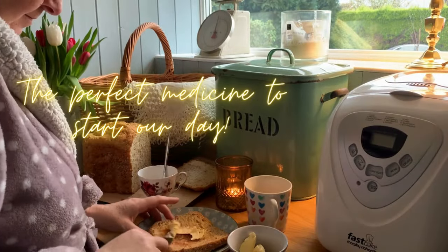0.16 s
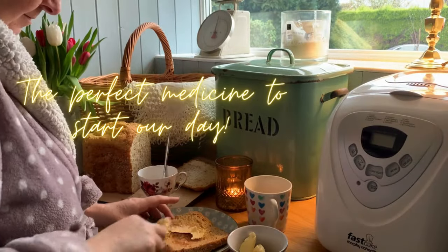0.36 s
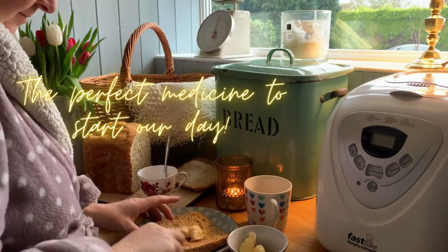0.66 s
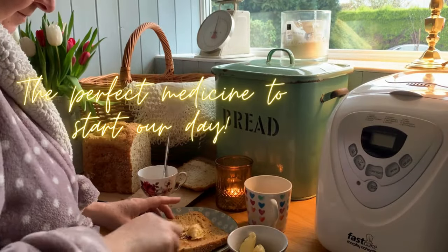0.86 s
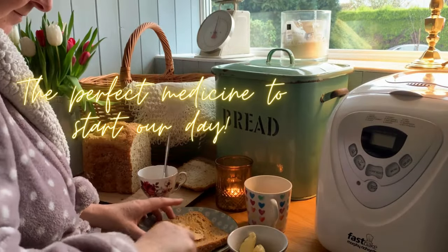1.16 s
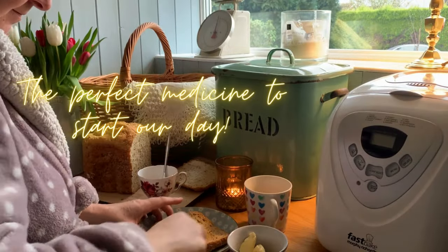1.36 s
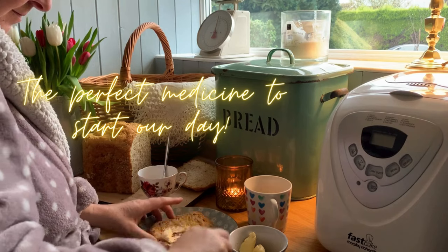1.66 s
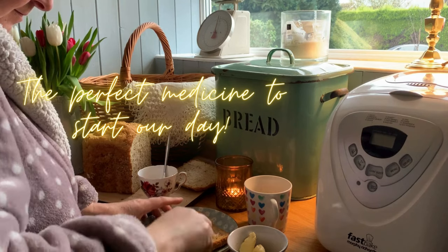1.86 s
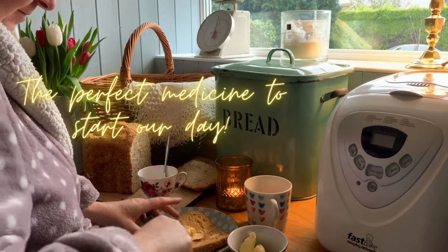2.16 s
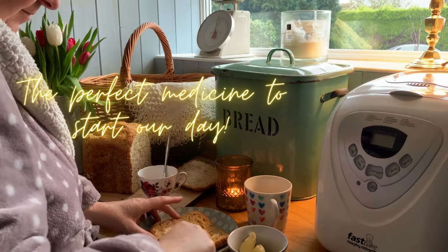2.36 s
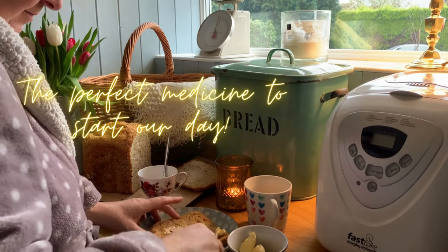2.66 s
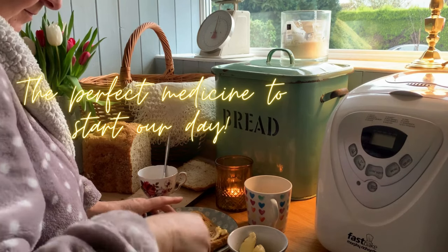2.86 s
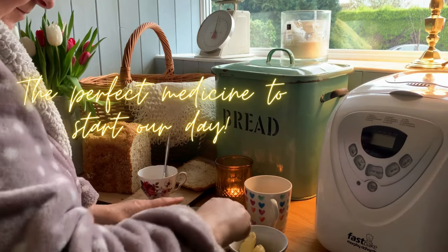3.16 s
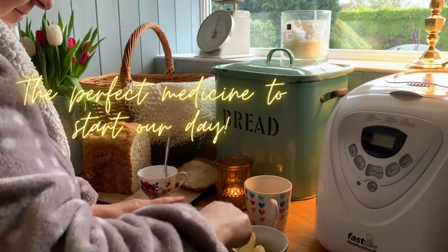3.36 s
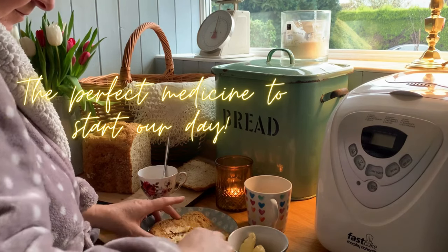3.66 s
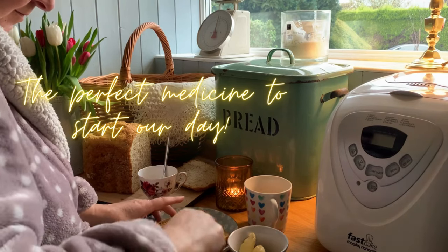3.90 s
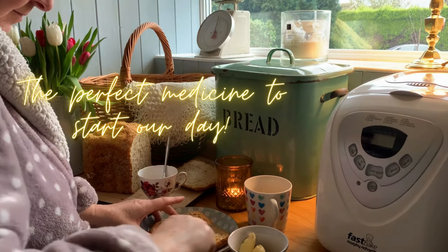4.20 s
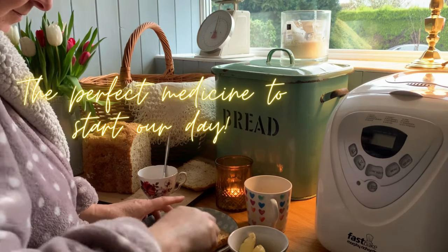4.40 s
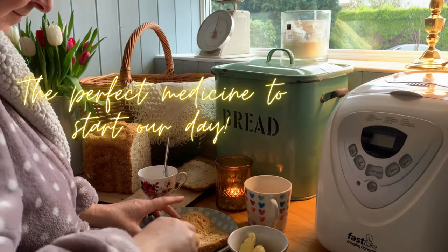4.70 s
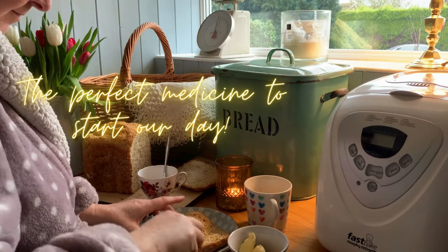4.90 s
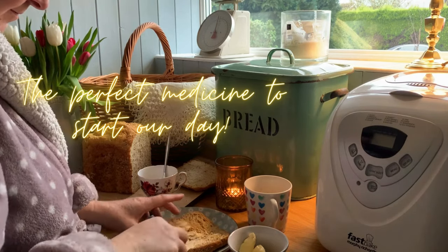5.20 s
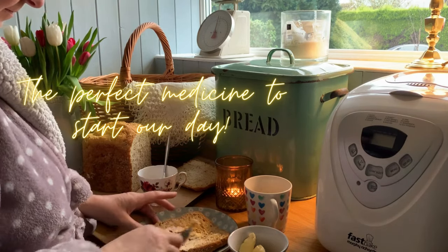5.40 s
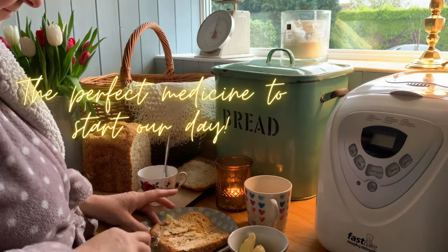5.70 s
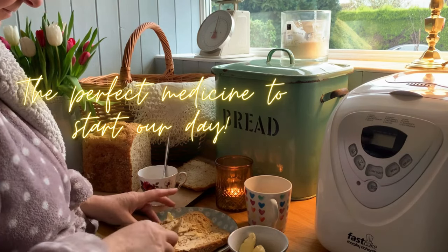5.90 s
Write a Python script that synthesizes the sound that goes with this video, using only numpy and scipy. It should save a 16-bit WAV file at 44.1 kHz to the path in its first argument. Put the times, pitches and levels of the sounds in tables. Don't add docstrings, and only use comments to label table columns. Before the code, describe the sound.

A phone sits close to a kitchen counter in a small, quiet room with a faint unsteady fridge whine. From 0 to 0.3 seconds a knife already scrapes thick toast, thin steely hiss over gritty crust, crumbs snapping. More brisk strokes come at about 0.6 to 0.8, a short one near 1.1 and another at 1.7, with low soft drumming from the plate and counter between them. From 2.2 to 2.9 the scrapes are light and faint, with small crackles. At 3.14 the blade clinks brightly on a small china bowl, slightly right, clinks again, choked, at 3.24, and grinds along it until 3.5. Soft counter thumps surround 3.8. Firmer toast strokes follow around 4.2, 4.6 to 4.75 and 5.05, with a heavier thump near 4.8, then a crackly drawn-out scrape from 5.45 to 5.75. At 6.0 the edge catches hard crust.

```python
import sys
import numpy as np
from scipy import signal
from scipy.fft import rfft, irfft, next_fast_len
from scipy.io import wavfile
from scipy.ndimage import uniform_filter1d, map_coordinates

SR = 44100
rng = np.random.default_rng(int(sys.argv[2]) if len(sys.argv) > 2 else 0)


def persist_wave(psi):
    counts = np.round(np.clip(psi, -1, 1) * 32767).astype(np.int16)
    wavfile.write(sys.argv[1], SR, np.atleast_2d(counts).T)


def boost(x):
    u = np.asarray(x, float) / 20
    return 10 ** u


N = 266805

# edge lands [t/s], time to full pressure [t/s], time it drags on [t/s],
# blade [level/dB], crust [level/dB]
STROKES = [(-0.05, 0.13, 0.13, -32, -39), (0.077, 0.025, 0.031, -30.5, -35),
           (0.195, 0.067, 0.07, -30, -40.5), (0.585, 0.05, 0.08, -31, -40),
           (0.656, 0.012, 0.13, -24.5, -31.5), (1.072, 0.092, 0.057, -29.5, -37),
           (1.662, .12, 0.056, -30, -45), (2.172, 0.0064, 0.072, -74, -87),
           (2.275, 0.15, 0.22, -49.5, -51.5), (2.53, 0.05, 0.11, -50, -51),
           (2.639, 0.13, 0.097, -48, -58.5), (3.259, 0.11, 0.25, -45.5, -56.5),
           (2.849, 0.0093, 0.025, -74, -74), (3.489, 0.03, 0.19, -42, -47), (3.576, 0.17, 0.11, -38, -44),
           (4.095, 0.05, 0.094, -44, -50), (4.141, 0.1, 0.057, -35, -46.5), (4.556, 0.068, .07, -37.5, -45),
           (4.648, 0.054, 0.071, -33.5, -37.5), (5.007, 0.054, 0.067, -33.5, -36.5),
           (5.435, 0.023, 0.057, -59.5, -45.5), (5.453, 0.066, 0.3, -35, -44.5),
           (5.62, 0.06, 0.026, -39.5, -47.5), (5.969, 0.037, 0.0046, -40, -51.5)]
# [f/Hz], width [f/Hz], [level/dB]
HARD_EDGE = [(1310, 290, -3.5), (1950, 430, 0.5)]
# [t/s], [level/dB]
EDGE_CATCH = [
    (5.965, -120),
    (5.978, -67),
    (5.993, -50.5),
    (6.02, -48.5),
    (6.05, -73),
]


def knife():
    *_, blade_top, crust_top = np.transpose(STROKES)[:, :, None]
    grit_top = -8.5 + blade_top + 0.29 * (crust_top - blade_top)
    blade_db = summed(blade_top + pressure(lag=0, lingers=0.98, light_db=-17))
    crust_db = summed(crust_top + pressure(lag=0.0015, lingers=0.83, light_db=-15, lead=0.0012))
    grit_db = summed(grit_top + pressure(lag=0.00075, lingers=0.85, light_db=-8.5, lead=0.0006))

    drive = crumbs(spread_db=3.5, clump_db=2, rate=140) * catching()
    steel = unit(blade(drive))
    toast = slice_of_toast(drive)
    gritty = grit(drive)
    scrape = boost(blade_db + 4.0) * steel + boost(crust_db) * unit(toast) + boost(grit_db) * gritty
    scrape += boost(curves(EDGE_CATCH)[0]) * body(HARD_EDGE, drive, own_db=1, rate=36)

    bright, dull = snaps()
    snap = bright * steel + dull * unit(toast + gritty)
    crack = boost(0.5) * filtered(bright, causal(STEEL_HISS))
    crack += boost(10) * filtered(dull, causal(CRUST_TONE[:-2] + GRIT_TONE[2:]))
    return scrape + boost(-7.0) * filtered(snap, lambda f: f > 400) + crack


STEEL_PITCHES = [6400, 7200, 7780, 8268, 8978, 9700, 10400, 10750, 11650, 12100, 12950, 14200, 14850, 15600]
# width [f/Hz], [level/dB]
STEEL_RINGS = [(110, -6), (50, -11.5), (50, -10), (61, 0.5), (45, -7), (64.6, -5), (82.4, -4.5), (88.5, -3),
               (122, 0), (139, -5.5), (200, -1), (140, 0), (110, -0.5), (160, -8.5)]
# [t/s], [level/dB]
FLATTER = [
    (0, -2),
    (2.2, -6.5),
    (3.5, 10.5),
    (4.2, 10.5),
    (4.9, 10),
    (6.05, -4),
]
# [f/Hz], [level/dB per Hz]
STEEL_HISS = [(2940, -60), (5000, -28), (7630, 0), (8060, -12.5), (8760, 0.5), (11500, 0.5), (12600, 6.5),
              (16200, -5.5)]


def blade(drive):
    modes = [(hz, *row) for hz, row in zip(STEEL_PITCHES, STEEL_RINGS)]
    song = body(modes[1:], drive, own_db=3.5, rate=45)
    lowest = body(modes[:1], drive, own_db=9.0, rate=40)
    hiss = patchy(filtered(drive, causal(STEEL_HISS)), depth_db=4.5)
    return song + boost(curves(FLATTER)[0] - 19.0) * lowest + boost(-3.0) * hiss


# [f/Hz], width [f/Hz], [level/dB]
TOAST_TONES = [(553, 30, -5), (702, 30, -2), (845, 40, -5), (1005, 40, -3), (1130, 50, -3), (1250, 50, -5),
               (1510, 50, -7), (1759, 40, -7)]
# [f/Hz], [level/dB per Hz]
CRUST_TONE = [(150, -36.5), (250, -4.5), (600, 5), (720, 8.5), (1170, 8), (1800, 3.5), (3500, -7),
              (4550, -43), (7700, -120)]


def slice_of_toast(drive):
    hollow = body(TOAST_TONES, drive, own_db=4, rate=34)
    return boost(-9.5) * hollow + patchy(filtered(drive, causal(CRUST_TONE)), depth_db=3)


# [f/Hz], [level/dB per Hz]
GRIT_TONE = [(1180, -41), (2000, -7), (3760, -1), (4610, 2.5), (5590, -3), (6210, 7), (7500, -0.5),
             (9750, -28.5), (16500, -120)]


def grit(drive):
    return patchy(filtered(drive, causal(GRIT_TONE)), depth_db=3)


# [t/s], peak [level/dB], share of low sound [level/dB]
CRUMB_SNAPS = [(0.091, -36.5, -9), (0.2115, -25.5, -27.5), (0.224, -26, -24.5), (0.553, -56.5, -9),
               (0.608, -38, -6), (0.626, -25, -25.5), (0.6969, -26.5, -8), (0.7287, -25.5, -10),
               (1.0702, -40.5, -21.5), (1.0905, -36.5, -4.5), (1.6658, -51.5, -23), (1.709, -29.5, -20.5),
               (2.172, -57, -38), (2.285, -55, -0.5), (2.3355, -45.5, -4), (2.581, -46.5, 0),
               (2.7908, -30.5, -37.5), (3.4061, -32, -14), (3.5381, -38.5, -19.5), (4.118, -39.5, -4),
               (4.1665, -31, -7), (4.559, -49.5, 4), (4.594, -31, -8), (4.6552, -20.5, -15.5),
               (5.019, -41, -5.5), (5.046, -28, -3), (5.439, -67, 11), (5.4536, -47.5, -15),
               (5.464, -38.5, -9.5), (5.528, -30.5, -15), (5.9906, -34.5, -25.5), (0.0165, -34, -17.5),
               (0.14, -29, -9), (0.2195, -23.5, -29), (0.7391, -24.5, -14), (0.8105, -27.5, -21.5),
               (2.384, -45.5, -15.5), (2.4075, -38, -17), (2.4214, -34.5, -12), (2.6782, -40, -10.5),
               (2.7322, -38.5, -20), (2.7455, -35.5, -15), (2.8011, -34.5, -34), (2.8545, -44.5, -21),
               (4.6137, -28.5, -22), (5.522, -33, -19), (5.606, -38.5, -23.5), (5.6308, -31.5, -18.5),
               (5.6557, -30, -11), (5.665, -28.5, -28), (5.709, -28, -25)]


def snaps():
    bright, dull = np.zeros(N + SR), np.zeros(N + SR)
    t = np.arange(SR // 20) / SR
    onset = 1 - np.exp(-t / 0.000084)
    fade = boost(8.0 - 60 * t / 0.0045) + boost(-17.0 - 60 * t / 0.044)
    for s, db, low_db in CRUMB_SNAPS:
        noise = rng.standard_normal(len(t))
        start = round(s * SR)
        bright[start:][:len(t)] += boost(db) * fade * noise * onset
        dull[start:][:len(t)] += boost(db + low_db - 9.5 - 60 * t / 0.14) * noise
    return bright[:N], dull[:N]


# [t/s], jolt [level/dB] (under 2 counts as 2, then 2 more), time to fade
# 60 dB [t/s]
RIDGES = [(0.0166, 5, 0.033), (0.0422, 0.5, .04), (.077, -0.5, .04), (.094, 5, 0.036), (0.113, 4, .02),
          (0.143, 12, .02), (.167, 3, .05), (.2208, 4, 0.0089), (.24, -4, 0.017), (.268, -5.5, 0.024),
          (0.622, 4, .04), (0.634, 1.5, 0.018), (.647, 4, .04), (0.71, 9, .04), (.737, 0.5, 0.026),
          (.764, -4, 0.03), (.8061, 1, 0.032), (1.0804, -2.5, 0.028), (1.1179, 12, .04), (1.1353, 5.5, .04),
          (1.1488, 5.5, 0.02), (1.7, 4.5, 0.021), (1.71, 4, 0.044), (1.7749, 3.5, 0.043),
          (2.336, 5.5, 0.035), (2.386, 6.5, 0.038), (2.422, 6.5, .035), (2.7327, 8.5, 0.014),
          (2.7448, 0.5, .03), (2.801, 9, 0.045), (2.8552, 14.5, 0.033), (3.3837, 0, 0.036),
          (3.5225, 0, 0.019), (3.7496, 0, 0.056), (3.8438, 7, 0.031), (4.166, 2, .05), (4.2436, 1.5, .045),
          (4.261, 7.5, 0.035), (4.282, 6, 0.042), (4.307, 6.5, 0.048), (4.5757, 4.5, .03),
          (4.6129, 2.5, .02), (4.619, 2.5, .06), (4.655, 10.5, .05), (4.717, 1.5, .03), (5.031, 2.5, .04),
          (5.042, 7, .08), (5.468, 9, 0.043), (5.497, 8.5, .025), (5.518, 7, 0.035), (5.5587, 5.5, 0.033),
          (5.632, 4.5, 0.035), (5.657, 0.5, 0.025)]


def catching():
    gain, t = np.ones(N + SR), np.arange(SR // 10) / SR
    onset = 1 - np.exp(-t / 0.00075)
    for s, db, t60 in RIDGES:
        jolt = boost(max(db, 2) + 2) - 1
        gain[round(s * SR):][:len(t)] += jolt * boost(-60 * t / t60) * onset
    return gain[:N]


def pressure(lag, lingers, light_db, lead=0):
    t, shapes, land_s = clock(), [], 0.023
    for s, build, drag, *_ in STROKES:
        top = s + land_s + max(build - land_s + lag, .001)
        sag_db = -108.5 * drag * lingers
        lifted_db = sag_db - 264.5 * lingers
        times = [s - land_s / 2 - lead, s + land_s / 2 - lead, top, top + drag, top + drag + 1]
        shapes.append(np.interp(t, times, [-80, light_db, 0, sag_db, lifted_db], left=-150))
    return np.array(shapes)


def crumbs(spread_db, clump_db, rate):
    largeness = np.minimum(rng.exponential(size=N), 6.5)
    size = boost(spread_db * largeness + clump_db * wobble(rate))
    return unit(size * rng.standard_normal(N))


# [f/Hz], width [f/Hz], [level/dB]
COUNTER_TONES = [
    [(62, 22, -12.5), (91, 30, -10), (122.9, 19, -2)],
    [(156.2, 22, 0)],
    [(217.8, 12, -0.5), (235.8, 24, -13)],
    [(278.7, 3.1, 7.5), (343, 150, -3.5), (398, 160, -8)],
]
COUNTER_GIVE = [
    0.27,
    1.4,
    0.25,
    -0.98,
]


def worktop():
    low = np.zeros((2, N))
    for modes, give_db in zip(COUNTER_TONES, COUNTER_GIVE):
        strongest_hz = max(modes, key=lambda row: row[2])[0]
        db = give_db + leaning(strongest_hz)
        mid, side = [body(modes, crumbs(spread_db=-0.5, clump_db=1.0, rate=39), own_db=3.0, rate=4.9, order=2)
                     for _ in range(2)]
        mid = mid / np.sqrt(0.15 + abs(uniform_filter1d(mid ** 2, size=SR // 16)))
        low += boost(db) * np.array([mid + boost(-14.0) * side, mid - boost(-10.5) * side])
    return filtered(low, lambda f: f ** 2 / (f ** 2 + 45 ** 2) / (1 + (f / 450) ** 4))


# [t/s], length [t/s], [level/dB], favoured pitch [f/Hz]
HAND_LEANS = [(0.163, 0.31, -52.5, 157), (0.307, 0.23, -53, 214), (0.517, 0.51, -60.5, 130),
              (0.76, 0.17, -45.5, 160), (0.873, 0.061, -53, 210), (1.15, 0.18, -52.5, 130),
              (1.207, 0.17, -51.5, 220), (1.277, 0.067, -53, 140), (1.821, 0.3, -55.5, 140),
              (2.338, 0.17, -58.5, 288), (2.498, 0.31, -51.5, 179), (2.644, 0.11, -53.5, 140),
              (2.783, 0.093, -49.5, 277), (2.872, 0.29, -54.5, 140), (3.098, 0.087, -59, 287),
              (3.199, 0.08, -43.5, 200), (3.292, 0.11, -48.5, 178.2), (3.587, 0.14, -45, 125),
              (3.661, 0.3, -51, 214), (3.782, 0.12, -39.5, 164.4), (3.873, .12, -48.5, 202),
              (4.153, 0.07, -44, 329), (4.304, 0.067, -48.5, 121), (4.267, 0.23, -49, 235),
              (4.398, 0.093, -61, 125), (4.665, 0.068, -49.5, 245), (4.784, 0.14, -39, 200),
              (5.147, 0.15, -47.5, 206), (5.571, 0.25, -54.5, 150), (5.734, 0.29, -58, 260),
              (6.04, 0.14, -60, 116)]


def leaning(hz):
    t, levels = clock(), []
    for s, length, db, pitch in HAND_LEANS:
        away = abs((t - s) / length / np.where(t < s, 0.86, 1))
        octaves_off = abs(np.log2(hz / pitch))
        levels.append(db - 24 * away ** 1.48 - 13 * octaves_off)
    return summed(levels)


CHINA_PITCHES = [549, 1314, 1941, 2048, 2078, 2143, 2345, 3779, 5343, 5385, 5462, 5552, 5770, 6050, 9659,
                 12300, 14320, 14625]
# first place struck [level/dB], second place [level/dB], time to fade 60 dB [t/s]
CHINA_RINGS = [(-32, -24, 0.13), (-21.5, -21.5, 0.18), (-33, -20, 0.087), (-20, -19, 0.044),
               (-35, -0.5, 0.075), (-3, -4, 0.15), (-24.5, -20, 0.1), (-17.5, -23, 0.049),
               (-19.5, -22, 0.08), (-13.5, -19.5, 0.25), (-17.5, -25.5, 0.19), (-15.5, -5.5, 0.15),
               (-18, -14.5, 0.0545), (-22, -23.5, 0.095), (-10.5, -8.5, 0.11), (-31.5, -14.5, 0.044),
               (-15, -32, .09), (-18.5, -8, 0.12)]
# [t/s], peak [level/dB], time until the blade chokes the ring [t/s], lost [level/dB]
BOWL_HITS = [
    (3.1393, -10.5, 0.158, 0),
    (3.2355, -14.5, 0.014, -8.5),
    (3.2435, -13.5, 0.0025, -30),
    (3.2875, -29.5, 0.0092, -6),
]
# [f/Hz], [level/dB per Hz]
KNOCK_TONE = [(60, -33.5), (200, -8), (600, -6.5), (2000, -7.5), (4300, -16), (5600, -6.5), (8000, -17.5),
              (12500, -8.5), (16200, -23)]


def bowl():
    ring, blow = np.zeros(N + SR), np.zeros(N + SR)
    t = np.arange(SR // 3) / SR
    burst = boost(-7.5 - 60 * t / 0.024) + boost(-10.0 - 60 * t / 0.31)
    for k, (s, db, free, lost_db) in enumerate(BOWL_HITS):
        tone = np.zeros(len(t))
        for hz, (first, second, t60) in zip(CHINA_PITCHES, CHINA_RINGS):
            place_db = second if k else first
            fade = boost(place_db - 60 * t / t60 + 2 * uneven(t))
            tone += fade * np.sin(2 * np.pi * hz * t + 0.3 * uneven(t))
        choke = boost(lost_db * np.clip((t - free) / 0.0023, 0, 1))
        start = round(s * SR)
        ring[start:][:len(t)] += boost(db) * tone * choke * (1 - np.exp(-t / 0.0032))
        blow[start:][:len(t)] += boost(db) * burst * rng.standard_normal(len(t))
    return ring[:N] + filtered(blow[:N], causal(KNOCK_TONE)) + china_drag()


def uneven(t):
    knot_s = 0.015
    knots = rng.standard_normal(int(t[-1] / knot_s) + 4)
    return map_coordinates(knots, [t / knot_s], order=2)


# [t/s], [level/dB]
CHINA_SLIDE = [
    (3.09, -120),
    (3.11, -84.5),
    (3.137, -52.5),
    (3.22, -65),
    (3.24, -50.5),
    (3.3, -48.5),
    (3.39, -49.5),
    (3.5, -58.5),
    (3.55, -120),
]


def china_drag():
    grind = crumbs(spread_db=-1, clump_db=1.5, rate=69)
    china = filtered(grind, lambda f: sum(boost(row[1]) * mode(f, hz, 130)
                                          for hz, row in zip(CHINA_PITCHES, CHINA_RINGS)))
    knock = filtered(grind, causal(KNOCK_TONE))
    return boost(curves(CHINA_SLIDE)[0]) * unit(unit(china) + unit(knock))


# [f/Hz], time to fade 60 dB [t/s]
ROOM_FADE = [(150, 0.052), (1000, 0.11), (5000, 0.28), (12000, 0.047)]
# [f/Hz], [level/dB]
ROOM_SHARE = [(100, -26), (300, 6), (1000, 9.5), (2500, 5.5), (5000, 11), (7000, 3), (14000, -1.5)]


def kitchen(x, wet_db, lead):
    wet, step = np.zeros((2, N + SR)), SR // 5
    padded = np.pad(x, (step, 2 * step))
    for start in range(-step, N, step):
        hz, t, z = signal.stft(rng.standard_normal((2, SR // 3)), SR, nperseg=256)
        t60 = along(ROOM_FADE, hz)[:, None]
        tail = signal.istft(z * boost(-60 * t / t60) / np.sqrt(t60), SR, nperseg=256)[1]
        piece = padded[start + step:][:2 * step] * np.hanning(2 * step)
        piece = piece[max(-start, 0):]
        echo = signal.fftconvolve(piece[None], tail / np.linalg.norm(tail[0]), axes=1)
        wet[:, max(start, 0) + 60:][:, :echo.shape[1]] += echo

    def share(f):
        return 1 / (1 + boost(along(ROOM_SHARE, f) + wet_db) ** 2)

    def delay(f):
        return np.exp(2j * np.pi * f * np.array([[lead], [-lead]]) / SR)

    direct = filtered(x, lambda f: np.sqrt(share(f)) * delay(f))
    return direct + filtered(wet[:, :N], lambda f: np.sqrt(1 - share(f)))


# [f/Hz], [level/dB per Hz]
ROOM_HUSH = [(18, -30.5), (45, -2), (124, -3), (379, -17), (646, -16.5), (1380, -30.5), (7820, -38),
             (8500, -27.5), (9250, -34), (14500, -32), (16200, -38.5)]
# [f/Hz], [level/dB]
FRIDGE_WHINE = [
    (634, -83),
    (755, -82),
]
# [t/s], [level/dB]
FRIDGE_EFFORT = [
    (0, -3.5),
    (1.3, 1),
    (1.5, 6),
    (1.7, -5.5),
    (3, -4),
    (6.05, 1),
]


def background():
    hush = unit(filtered(rng.standard_normal((2, N)), lambda f: boost(along(ROOM_HUSH, f))))
    hush += filtered(hush[::-1] - hush, lambda f: .4 / (1 + (f / 70) ** 4))
    swell = boost(1.6 * wobble(3) + 1.2 * wobble(11))
    t, whine = np.arange(N) / SR, np.zeros(N)
    for hz, db in FRIDGE_WHINE:
        level = boost(db + curves(FRIDGE_EFFORT)[0] + 1.9 * wobble(33.0))
        whine += level * np.sin(2 * np.pi * hz * t + 8.4 * wobble(29.0))
    return boost(-67.0) * hush * swell + whine


def unit(x):
    return x / np.sqrt(np.mean(x ** 2) + 1e-20)


def along(points, hz):
    f, v = np.transpose(points)
    return np.interp(np.log(hz + 1), np.log(f + 1), v)


def curves(rows):
    s, *cols = np.transpose(rows)
    return [np.interp(np.arange(N) / SR, s, c) for c in cols]


def wobble(rate):
    knots = rng.standard_normal(int(N * rate / SR) + 4)
    return map_coordinates(knots, [np.arange(N) * rate / SR])


def clock():
    return np.arange(N * 1000 // SR + 2) / 1000


def summed(levels_db):
    total_db = 10 * np.log10(np.sum(boost(np.maximum(levels_db, -150)) ** 2, axis=0))
    return np.interp(np.arange(N) / SR, clock(), total_db)


def filtered(x, response):
    m = next_fast_len(N + SR // 2)
    return irfft(rfft(x, m) * response(np.fft.rfftfreq(m, 1 / SR)), m)[..., :N]


def mode(f, hz, width):
    return 1j * f * width / (hz * hz - f * f + 1j * f * width)


def causal(spectrum):
    def response(f):
        cep = irfft(np.log(boost(np.maximum(along(spectrum, f), -60))))
        cep[1:len(cep) // 2] *= 2
        cep[len(cep) // 2 + 1:] = 0
        return np.exp(rfft(cep))
    return response


def body(modes, drive, own_db, rate, order=1):
    total = np.zeros(N)
    for k, (hz, width, db) in enumerate(modes):
        push = drive * boost(own_db * wobble(rate))
        total += (-1) ** k * boost(db) * filtered(push, lambda f: mode(f, hz, width) ** order)
    return unit(total)


def patchy(x, depth_db):
    z = signal.stft(x, nperseg=256)[2]
    field = uniform_filter1d(rng.standard_normal(z.shape), size=4, axis=0)
    field = uniform_filter1d(field, size=9, axis=1)
    return unit(signal.istft(z * boost(depth_db * unit(field)), nperseg=256)[1][:N])


# [f/Hz], [level/dB]
LEFT_TILT = [(60, -1.5), (250, -1), (900, 1), (4000, -1), (7000, -0.5)]


def scene():
    china = kitchen(bowl(), wet_db=-9, lead=.6) * boost([[-2], [1.5]])
    near = kitchen(knife(), wet_db=-1.1, lead=2.13) + china + worktop()
    tilted = filtered(near, lambda f: boost(along(LEFT_TILT, f) * np.array([[1], [-1]])))
    return tilted + background()


# [f/Hz], width [f/Hz], readiness to drop out [no unit]
WEAK_BANDS = [(2750, 200, -1.7), (3600, 300, -1.6), (4650, 250, -1.6), (6500, 300, -1.6), (4200, 300, -1.8),
              (5150, 250, -1.7), (7750, 500, -1.1), (8620, 500, .2), (11000, 800, -.2), (11700, 600, -1),
              (13500, 750, .8), (14300, 600, -1.1), (9900, 400, -1.5), (15550, 600, -.3)]


def thin_treble(mid, side):
    mono_hz, top_hz, last_hz = 6850, 15850, 16500
    hz, t, z = signal.stft(np.array([mid, side]), SR, nperseg=1024)
    frames = np.minimum(t * SR, N - 1).astype(int)

    def level_db(band):
        return 10 * np.log10(np.sum(abs(z[0, band]) ** 2, axis=0) + 1e-14)

    treble_db = level_db(hz > mono_hz)
    ring_db = level_db((hz > 1900) & (hz < 2300))
    leap = np.roll(treble_db, -1) - np.roll(treble_db, 2) > 11
    masked = 0.14 * np.maximum(ring_db - treble_db, 0) * (ring_db > -62)
    for centre_hz, width, ready in WEAK_BANDS:
        rate = 9 if centre_hz > mono_hz else 22
        kept = leap | (wobble(rate)[frames] > ready + masked)
        z[:, abs(hz - centre_hz) < width / 2] *= kept
    for low in range(mono_hz, top_hz, 600):
        kept = leap | (wobble(25)[frames] > 1.5)
        z[1, (hz >= low) & (hz < low + 600)] *= boost(2 - 7 * np.log2(low / mono_hz)) * kept
    z[:, hz > top_hz] *= np.where(leap, boost(-16.5), boost(-39.5)) * (hz[hz > top_hz, None] < last_hz)
    return signal.istft(z, SR, nperseg=1024)[1][:, :N]


def top_cut(x):
    return signal.sosfilt(signal.butter(12, 16650, fs=SR, output="sos"), x)


# [f/Hz], width [f/Hz], depth [0-1]
PORT_DIPS = [
    (8550, 35, .8),
    (11790, 580, 1),
    (14000, 470, 0.7),
]


def record(dry):
    def port(f):
        return np.prod([1 - depth * mode(f, hz, width) for hz, width, depth in PORT_DIPS], axis=0)

    left, right = filtered(dry, port)
    mid, side = thin_treble((left + right) / 2, (left - right) / 2)
    return top_cut(np.array([mid + side, mid - side]))


dry = scene()
out = record(dry)
persist_wave(out)
```